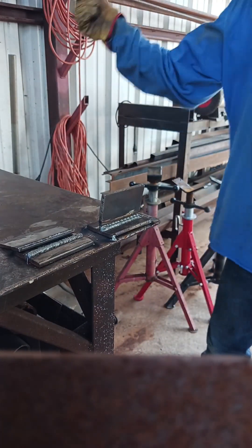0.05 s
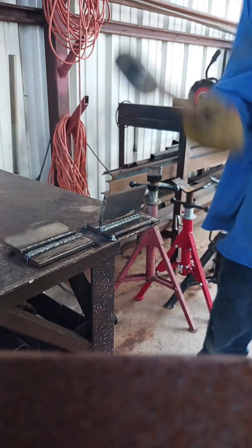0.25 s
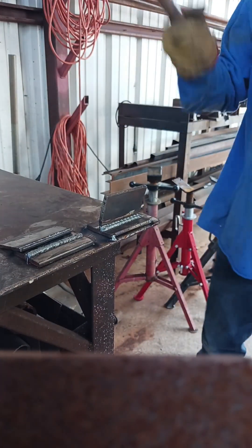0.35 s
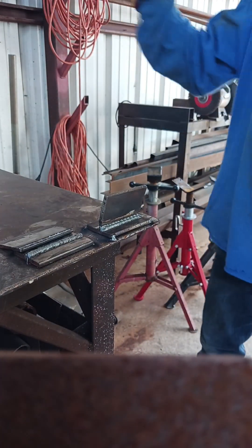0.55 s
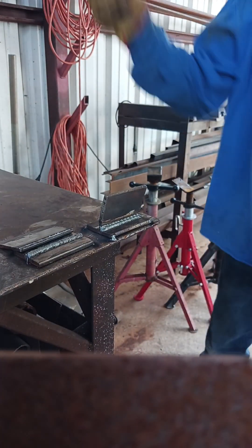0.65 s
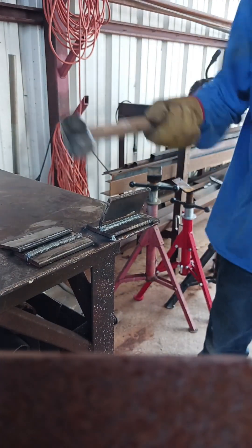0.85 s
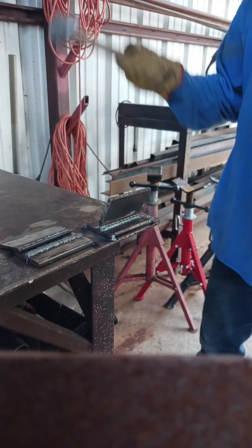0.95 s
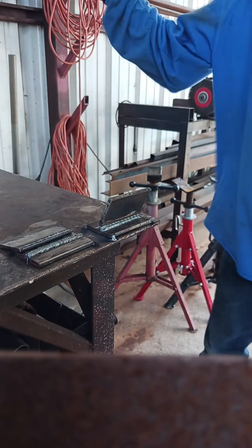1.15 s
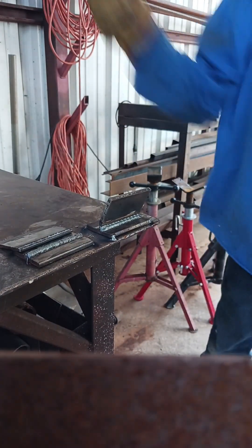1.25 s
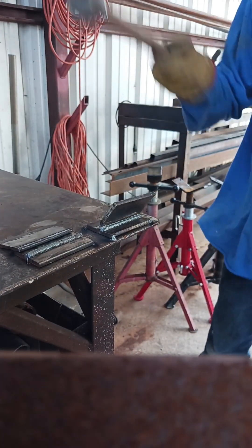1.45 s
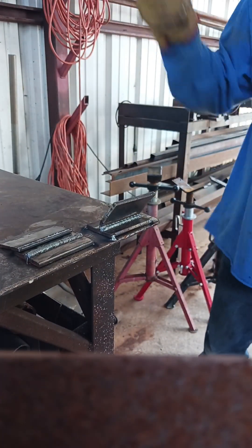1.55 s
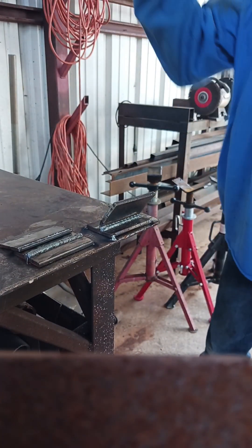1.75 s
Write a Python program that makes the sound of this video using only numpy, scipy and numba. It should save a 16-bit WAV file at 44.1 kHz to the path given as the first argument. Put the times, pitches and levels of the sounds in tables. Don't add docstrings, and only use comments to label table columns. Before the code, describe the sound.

Three loud, overloaded metallic hammer strikes on steel, with a brief rattle and boomy shed echo

```python
import sys
import numpy as np
from scipy import signal
from scipy.fft import rfft, irfft
from scipy.io import wavfile
from scipy.ndimage import uniform_filter1d
from numba import njit

SR = 44100
rng = np.random.default_rng(int(sys.argv[2]) if len(sys.argv) > 2 else 0)


def field_ratio(decibels):
    return 10 ** (np.asarray(decibels, dtype=float) / 20)


def log_audio(samples):
    frames = np.atleast_2d(samples).T
    limited = np.clip(frames, -1, 1)
    pcm = np.round(limited * 32767).astype(np.int16)
    wavfile.write(sys.argv[1], SR, pcm)


N = 79380
LEAD = int(0.5 * SR)
M = N + LEAD
BLOW_DB = 21


def read(table, hz):
    table = np.array(table)
    return np.interp(np.log(np.maximum(hz, 1)), np.log(table[:, 0]), table[:, 1])


def unit(x):
    return x / np.sqrt(np.sum(x ** 2))


def colour(x, table):
    size = x.shape[-1]
    gain = field_ratio(read(table, np.fft.rfftfreq(size, 1 / SR)))
    return irfft(rfft(x) * gain, size)


def ring(hz, t60, db, phase, rise=0.00016, size=SR // 2):
    t = np.arange(size)[:, None] / SR
    fade = np.log(1000) / np.maximum(t60, 0.005)
    modes = np.exp(t * (2j * np.pi * hz - fade) + 1j * phase).imag
    return (modes @ field_ratio(db)) * (1 - np.exp(-t[:, 0] / rise))


def add(out, x, s):
    i = int(round(s * SR)) + LEAD
    out[i:i + len(x)] += x[:len(out) - i]


# pitch in Hz, likeness from 0 to 1.
ALIKE = [(130, 0.67), (290, 0.77), (640, 0.27), (1400, .02), (15000, 0.033)]
# pitch in Hz, left minus right in dB.
LEAN = [(100, -3), (700, -8), (1300, -11), (2400, -2.5), (4400, -3), (6800, -1.5), (8500, 11), (11000, -1),
        (15500, 4)]


def room_noise(size):
    hz = np.fft.rfftfreq(size, 1 / SR)
    alike = np.clip(read(ALIKE, hz), 0, 1)
    mid, side = rfft(rng.standard_normal((2, size)))
    stereo = mid * np.sqrt(1 + alike) + side * np.sqrt(1 - alike) * np.array([[1], [-1]])
    return hz, stereo * field_ratio(read(LEAN, hz) * np.array([[0.5], [-0.5]]))


# pitch in Hz, level in dB per Hz.
AIR = [(18, -46.5), (30, -7), (108, 2.5), (885, -10), (1050, -1), (1230, -18.5), (1390, -2), (12000, -56),
       (15600, -63.5), (22000, -120)]
# pitch in Hz, gain in dB.
AIR_TOP = [(3000, 0), (6500, 0), (8500, -5)]


def air():
    x = irfft(room_noise(N)[1], N)
    x = colour(colour(x, AIR), AIR_TOP)
    return field_ratio(-57.5) * x / np.sqrt(np.mean(x ** 2))


# pitch in Hz, time to fall 60 dB in seconds.
SHED = [(100, 0.86), (400, 0.6641), (1500, 0.573), (4000, .5), (7000, 0.5054), (10000, 0.4),
        (16000, 0.2671)]


def shed():
    build_s = 0.019
    hz, spec = room_noise(SR)
    t, out = np.arange(SR) / SR, 0
    for centre in 56.6 * 2. ** np.arange(9):
        octaves_away = np.log2(np.maximum(hz, 62.5) / centre)
        share = np.cos(np.pi / 2 * np.clip(octaves_away, -1, 1)) ** 2
        t60 = max(read(SHED, centre), 0.05)
        fade = np.exp(-np.log(1000) * t / t60)
        out = out + irfft(spec * share, SR) * fade / np.sqrt(t60)
    return unit(out * (1 - np.exp(-t / build_s))) * np.sqrt(2)


# pitch in Hz, time to fall 60 dB in seconds, then level in dB for each stage of bending.
HEAD = [(5560, 1.5, -64, -66, -70), (12312, 1.3, -62, -56, -55), (12720, 1.6, -58, -72, -72)]


def hammer_head():
    out, head = np.zeros(M), np.array(HEAD)
    for s, db, _, stage in BLOWS:
        level_db = head[:, 2 + int(stage)] - 20
        add(out, field_ratio(BLOW_DB + db) * ring(head[:, 0], head[:, 1], level_db, 0, size=SR), s)
    return out


# start in seconds, level in dB, extra for its low pair in dB, extra for its top tones in dB.
BOUNCES = [
    (.2955, -0.5, 3, -10),
    (.318, -7.5, -7.5, 0.5),
    (.3355, -0.5, -7.5, 2.5),
    (.378, -19.5, -1, -8),
    (.425, -27, -4.5, -19.5),
    (.47, -31, -8, 0),
]
# pitch in Hz, time to fall 60 dB in seconds, level in dB.
OFFCUT = [(8156, .16, 0), (8228, .16, -3), (9811, .22, -11), (9912, .22, -10), (12317, .17, 0),
          (14472, .22, -13)]


def offcut():
    out, bar = np.zeros(M), np.array(OFFCUT)
    hz, t60 = bar[:, 0], bar[:, 1]
    for s, db, low_db, top_db in BOUNCES:
        tilt_db = np.where(hz < 9000, low_db, np.where(hz > 12000, top_db, 0))
        level_db = bar[:, 2] + tilt_db + db - 13
        add(out, ring(hz, t60, level_db, rng.standard_normal(len(bar)), rise=0.0015), s)
    return out


# start in seconds, level in dB, extra crack in dB, stage of bending (whole part: 0, 1 or 2).
BLOWS = [
    (-.36, -1.5, -0.5, 0),
    (0.2154, -2.5, 1.5, 0),
    (0.7657, -0.5, 1.5, 1),
    (1.3405, -2, 1.5, 1.99),
]
# pitch in Hz, time to fall 60 dB in seconds, then level in dB for each stage of bending.
STEEL = [(580, .03, -21.5, -37, -17.5), (802, 0.34, -23, -29, -13.5), (1168.5, 0.14, -2.5, -11, -4.5),
         (1289, .04, -5, -5.5, -18.5), (1494, 0.027, 0.5, 4, -2.5), (1590, 0.023, 1, -3.5, -6),
         (1648, 0.067, -5, -4, 0), (1838, 0.024, -6, -10.5, -12), (2080, .012, 1.5, -2.5, 2.5),
         (3350, 0.017, -7.5, 1, 0), (3670, 0.017, -11.5, 5, -1), (3712, .05, -14, -9, -0.5),
         (4390, 0.0047, -2, -21.5, -18.5), (4718, .035, -7.5, -13.5, -3)]
# pitch in Hz, then level in dB per Hz for each stage of bending.
CRACK = [(60, -20, -20.5, -22), (370, -16.5, -20.5, -22), (1440, -4.5, -8, -6), (2920, -7.5, -7, -7.5),
         (5510, -7.5, -11, -11.5), (9600, -20.5, -16, -14), (12000, -15.5, -11, -13),
         (16000, -26, -11.5, -12.5)]


def blows():
    crack_s, crack_level_db = 0.0066, 2.5
    through_steel_s, through_steel_db = 0.0012, -42.5
    out, steel = np.zeros(M), np.array(STEEL)
    hz, t60 = steel[:, 0], steel[:, 1]
    t = np.arange(SR // 8) / SR
    for s, db, crack_db, stage in BLOWS:
        stage = int(stage)
        detune, *phases = rng.standard_normal((3, len(steel)))
        burst = rfft(rng.standard_normal(len(t)) * np.exp(-t / crack_s))
        burst = irfft(burst / np.abs(burst), len(t))
        burst = colour(burst, np.array(CRACK)[:, [0, 1 + stage]]) * np.exp(-t / crack_s / 8)
        mode_db = steel[:, 2 + stage] - 10 * np.log10(t60)
        x = ring(hz, t60, mode_db, phases[0])
        x = unit(x + ring(hz * (1 + 0.017 * detune), t60, mode_db, phases[1]))
        x[:len(t)] += field_ratio(crack_level_db + crack_db) * unit(burst)
        add(out, field_ratio(BLOW_DB + db) * x, s)
        add(out, field_ratio(BLOW_DB + db + through_steel_db) * x[:SR // 100], s - through_steel_s)
    return out


def scene():
    direct_db, offcut_wet_db, head_wet_db = -12, -19, -7
    offcut_pan_db, head_pan_db = 15.5, 8.5
    hit, bar, head = blows(), offcut(), hammer_head()
    into_shed = hit + field_ratio(offcut_wet_db) * bar + field_ratio(head_wet_db) * head
    wet = signal.fftconvolve(into_shed[None], shed(), axes=1)[:, :M]
    near = field_ratio(direct_db) * hit + bar * field_ratio(np.array([[0], [-offcut_pan_db]]))
    near = near + head * field_ratio(np.array([[0], [-head_pan_db]]))
    return (wet + near)[:, LEAD:] + air()


@njit
def follow(x, up, down):
    e, y = 1e-9, np.empty(len(x))
    for i in range(len(x)):
        a = abs(x[i])
        e += (a - e) * (up if a > e else down)
        y[i] = e
    return y


def hold_level(x, hold_db):
    attack_s, release_s, ratio = 0.0005, 0.004, 8
    loudness = follow(x, 1 / (attack_s * SR), 1 / (release_s * SR))
    over = np.maximum(loudness / field_ratio(hold_db), 1)
    return x * over ** (1 / ratio - 1)


def thumps():
    noise, size = rng.standard_normal(N), rng.exponential(size=N // 64 + 1)
    kicks = noise * field_ratio(1.57 * np.repeat(size, 64)[:N])
    thump = signal.sosfilt(signal.butter(1, 364, fs=SR, output="sos"), kicks / np.std(kicks))
    return thump / np.std(thump)


# pitch in Hz, gain in dB.
MIC = [(5000, 0), (7200, 1.5), (9300, -5), (11000, -1), (12500, 0), (15500, -1.5)]


def microphones(dry):
    hold, limit, thump, fizz = (-10, -7.5), (-18, -16), (-30.5, -20.5), (-9.5, -11.5)
    break_width_db, sense = 4, int(0.011 * SR)
    out = []
    for x, hold_db, break_db, thump_db, fizz_db in zip(colour(dry, MIC), hold, limit, thump, fizz):
        y = hold_level(x, hold_db)
        recent_power = uniform_filter1d(x ** 2, sense, origin=sense // 2 - 1)
        load_db = 10 * np.log10(recent_power + 1e-9)
        strain = np.clip((load_db - break_db) / break_width_db, 0, 1)
        crackle = np.diff(np.abs(y), prepend=0)
        out.append(y + strain * (field_ratio(thump_db) * thumps() + field_ratio(fizz_db) * crackle))
    return np.array(out)


def top_cut(x):
    return signal.sosfilt(signal.butter(12, 17030, fs=SR, output="sos"), x)


def record(dry):
    out = microphones(dry)
    out = signal.sosfilt(signal.butter(2, 48, "high", fs=SR, output="sos"), out)
    out = signal.sosfilt(signal.ellip(10, 0.2, 70, 15650, fs=SR, output="sos"), out)
    return top_cut(np.clip(out, -1, 1))


dry = scene()
out = record(dry)
log_audio(out)
```